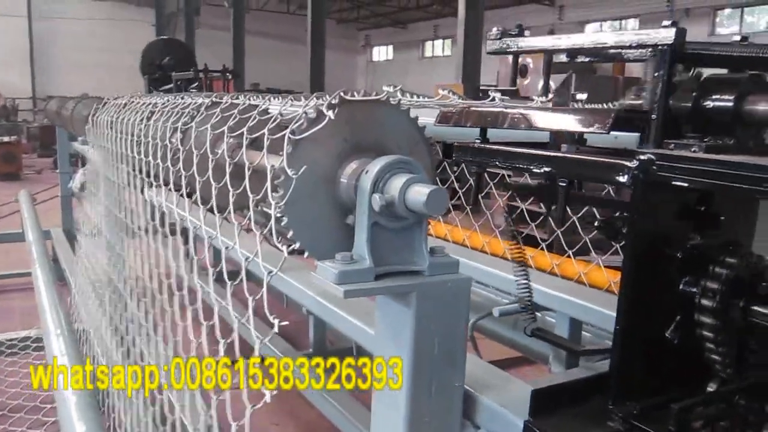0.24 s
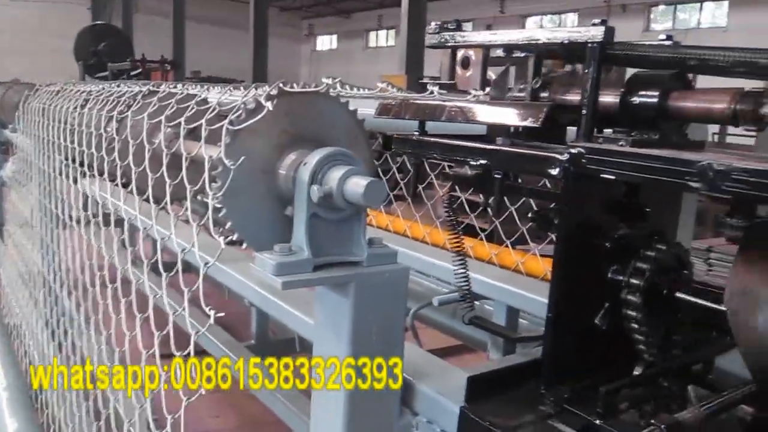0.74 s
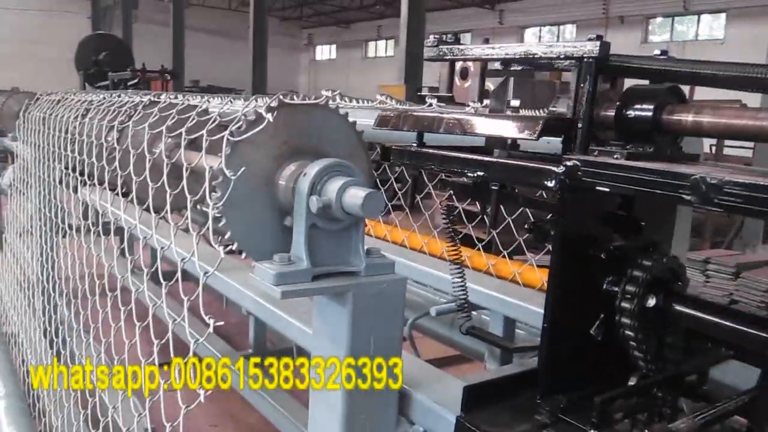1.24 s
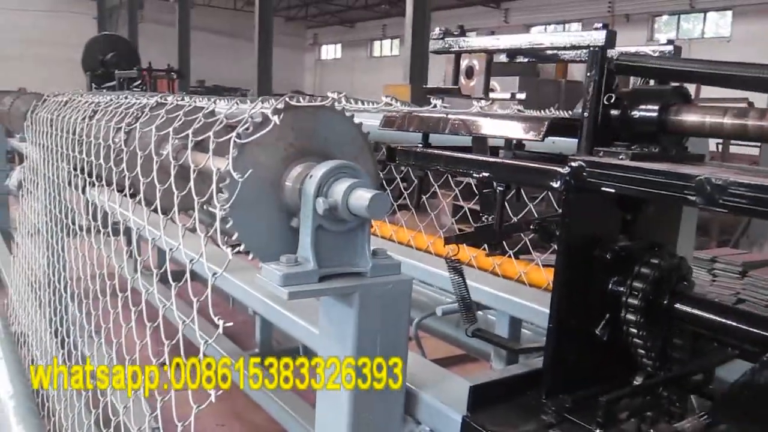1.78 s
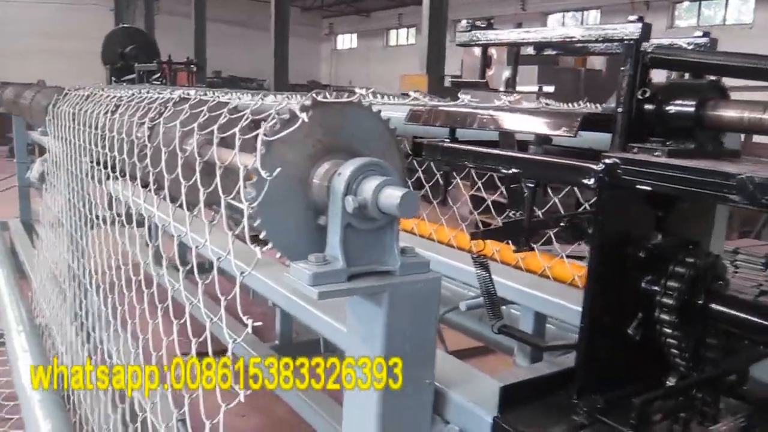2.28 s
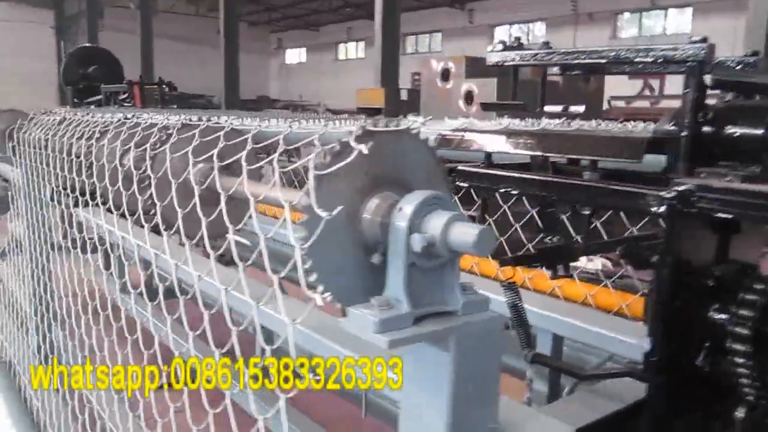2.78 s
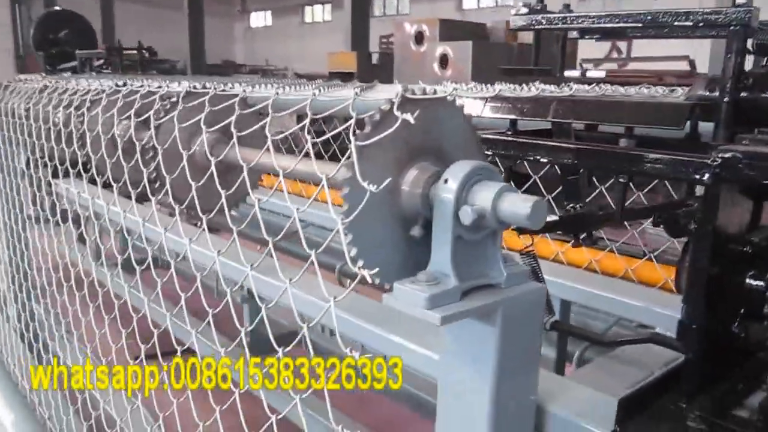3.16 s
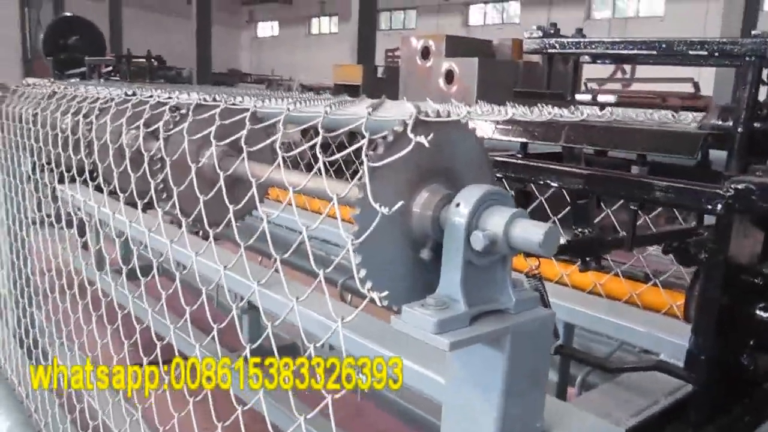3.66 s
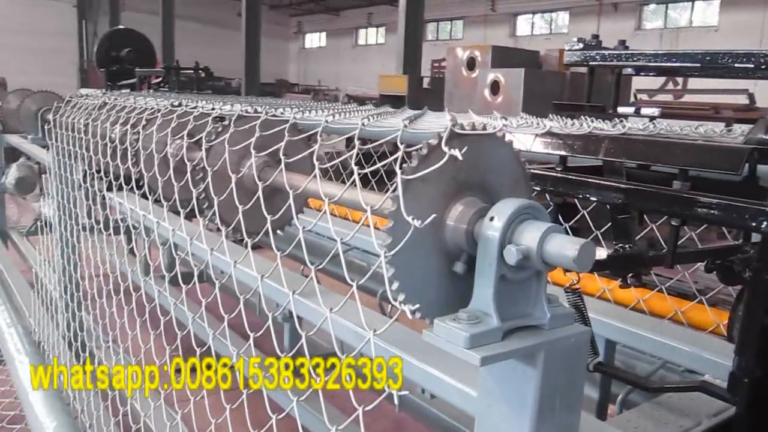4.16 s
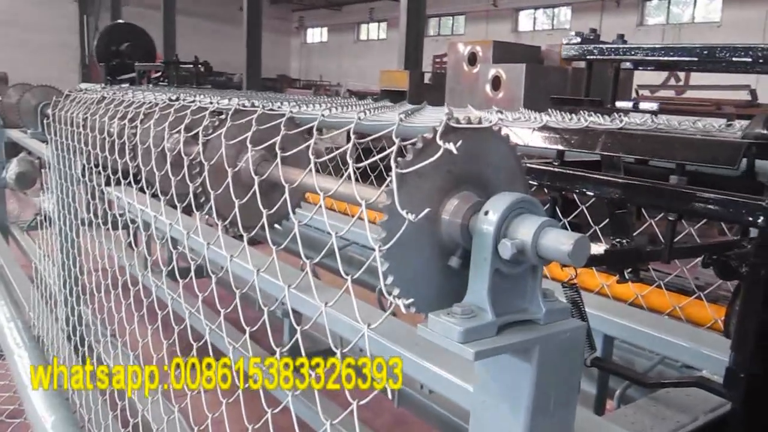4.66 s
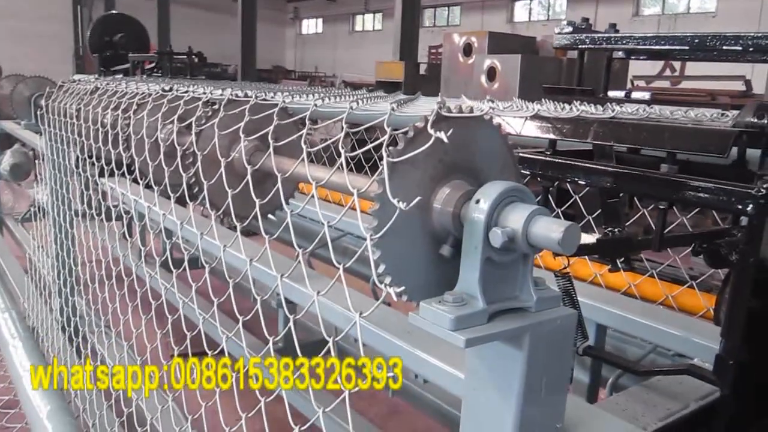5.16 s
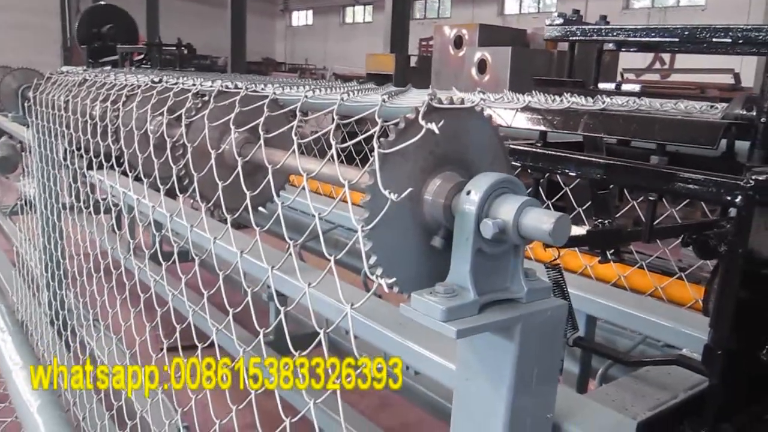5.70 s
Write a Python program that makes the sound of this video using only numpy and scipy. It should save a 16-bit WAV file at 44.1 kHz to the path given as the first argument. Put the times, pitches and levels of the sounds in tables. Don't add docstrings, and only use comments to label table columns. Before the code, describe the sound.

Close to a wire mesh weaving machine in a factory hall, a low gear hum throbs over rumble. Uneven snaps and hard steel clacks come first, the loudest just after one second and briefly dipping the level. Then quick, regular jingling slaps build and run to the end, with small knocks between them. Stereo small-camera sound with a short hall echo.

```python
import sys
import numpy as np
from scipy import signal
from scipy.fft import rfft, irfft, next_fast_len
from scipy.io import wavfile
from scipy.ndimage import uniform_filter1d

SR = 44100
rng = np.random.default_rng(int(sys.argv[2]) if len(sys.argv) > 2 else 0)


def attenuation_scalar(level_db):
    decades = np.asarray(level_db, float) / 20
    return 10 ** decades


def inscribe(sig):
    pcm = np.round(np.clip(np.atleast_2d(sig).T, -1, 1) * 32767)
    wavfile.write(sys.argv[1], SR, pcm.astype(np.int16))


N = 261513
SIZE = next_fast_len(N + N % 2, True)
HZ = np.fft.rfftfreq(SIZE, 1 / SR)
T = np.arange(N) / SR

TURN_S, MESH_HZ = 0.3, 200
WEAVE_START_S = 1.03

# throbs_per_turn, depth_db, first_peak_s
LOAD_THROB = [
    [(1, 1.3, .296), (2, 2, .124), (4, 1.7, .031)],
    [(1, 1.3, .113), (2, 1.1, .14), (3, 1.8, .083), (4, 2.5, .019)],
    [(1, 3.2, .266), (2, 4.1, .146), (4, 2.9, .045), (5, 2.8, .009), (6, 3, .043)],
]
# throbs_per_turn, depth_db, first_peak_s
THROB_BEFORE_STEP = [(1, 1.5, .183), (2, 2.2, .035), (3, 3.6, .09), (4, 3.6, .023)]
# sways_per_turn, depth_ms, first_peak_s
RUNOUT_SWAY = [
    [(1, .43, .122), (2, .21, .08), (3, .19, .083), (4, .17, .029)],
    [(2, .05, .108), (3, .11, .012), (4, .11, .039)],
]
# order_of_turn, level_db
CASING_ORDERS = [(130, -43), (135, -41), (138, -36), (141, -35.5), (146, -44), (149, -38), (150, -42),
                 (156, -42)]
# freq_hz, density_db (per Hz)
TOOTH_WEAR = [(60, -20), (150, -17), (200, -20), (235, -7), (290, -9), (340, -2), (385, -12), (555, -24),
              (660, -12), (750, -13), (797, 6), (870, -12), (990, -1), (1250, -19)]
# freq_hz, level_db
SHAFT_TONES = [(120, -50), (300, -46), (650, -46), (720, -45), (1193.3, -50)]
MESH_BEFORE_DB, MESH_AFTER_DB = (-26.5, -23.5, -33, -35), (-28.5, -21.5, -35.5, -35.5)
STEP_S, STEP_TAKES_S = 2.47, 0.24
CASING_TRIM_DB, KICK_S, WEAR_DB = 2.8, 0.023, -33


def gear():
    after = 1 / (1 + np.exp((STEP_S - T) / STEP_TAKES_S))
    throb1, throb2, throb3 = (swing(rows) for rows in LOAD_THROB)
    throb2 = after * throb2 + (1 - after) * swing(THROB_BEFORE_STEP)
    tone_early_ms, multiples_early_ms = (swing(rows) for rows in RUNOUT_SWAY)

    tones = np.zeros(N)
    for m, throb_db in enumerate((throb1, throb2, throb3, throb1)):
        early_ms = multiples_early_ms if m else tone_early_ms
        cycles = (m + 1) * MESH_HZ * (T + early_ms / 1000) + rng.random()
        mean_db = MESH_BEFORE_DB[m] + (MESH_AFTER_DB[m] - MESH_BEFORE_DB[m]) * after
        tones += attenuation_scalar(mean_db + throb_db) * np.cos(2 * np.pi * cycles)

    casing = swing([(order, attenuation_scalar(db + CASING_TRIM_DB), KICK_S) for order, db in CASING_ORDERS])

    turn_size = round(TURN_S * SR)
    wear_colour = attenuation_scalar(read(TOOTH_WEAR, np.fft.rfftfreq(turn_size, 1 / SR)))
    wear = irfft(wear_colour * rfft(rng.standard_normal(turn_size)), turn_size)

    hum = np.sqrt(2) * (tones + casing) + attenuation_scalar(WEAR_DB) * np.resize(evened(wear), N)
    for freq_hz, db in SHAFT_TONES:
        hum += attenuation_scalar(db) * np.sqrt(2) * np.sin(2 * np.pi * freq_hz * T)
    return ports(hum, np.roll(hum, 3000))


def swing(rows):
    t = T[:round(TURN_S * SR)]
    one_turn = sum(depth * np.cos(2 * np.pi * count * (t - s) / TURN_S) for count, depth, s in rows)
    return np.resize(one_turn, N)


# start_s, level_db (peak), body_db, t60_s
BLADE_SLAPS = [(1.6258, -21, -7, 0.073), (1.785, -18, -8.5, 0.16), (1.9306, -13.5, -12.5, 0.082),
               (2.0767, -13, -12.5, 0.12), (2.234, -9.5, -20, 0.057), (2.387, -4.5, -15, 0.039),
               (2.5402, -12.5, -31, 0.078), (2.6885, -10.5, -9.5, 0.087), (2.8415, -10, -21, 0.13),
               (2.9963, -7.5, -10.5, 0.086), (3.1493, -9.5, -18, 0.089), (3.2915, -9, -9, 0.13),
               (3.4548, -8, -12.5, 0.068), (3.593, -7.5, -18, 0.079), (3.782, -11.5, -9.5, 0.044),
               (3.8942, -8.5, -14, 0.13), (4.0592, -8.5, -9.5, 0.077), (4.197, -6, -12, 0.11),
               (4.3601, -13, -12, 0.12), (4.5015, -8.5, -11, 0.089), (4.6773, -9, -10.5, 0.06),
               (4.8021, -11, -9.5, 0.085), (4.9717, -12.5, -11, 0.08), (5.1062, -8, -11, 0.092),
               (5.285, -8, -11, 0.041), (5.4012, -6.5, -11, 0.087), (5.5504, -9.5, -12, 0.12),
               (5.723, -7, -16, 0.044), (5.8734, -9.5, -7.5, 0.065)]
# start_s, level_db (peak), body_db
FEED_SNAPS = [(.0034, -14.5, 2), (.0114, -14.5, -16), (0.0522, -5, -0.5), (.0814, -25.5, 6),
              (0.1264, -18.5, 0.5), (.2319, -16, -18), (.3012, -20.5, -2), (.422, -11, -27),
              (0.4648, -16.5, -6), (.5394, -12, -16), (.5744, -16, -6), (.605, -4.5, -15),
              (.6164, -19.5, 6), (0.66, -11, -17), (0.7184, -10.5, -20), (0.757, -14, -20),
              (0.781, -22, 3.5), (0.8516, -19.5, -25), (.8824, -15, -12), (1.0228, -9, -27),
              (1.036, -12, -12), (1.067, -4, -9.5), (1.133, -6, -13.5), (1.1615, -4, -14), (1.1896, -17, 3),
              (1.1985, -10, -4), (1.2926, -12.5, -7.5), (1.383, -29.5, 6), (1.482, -15.5, -14),
              (1.5045, -25.5, 7.5)]
# start_s, level_db (peak), body_db
WIRE_TOUCHES = [(1.6862, -24.5, -3.5), (1.9854, -32, 6.5), (2.0249, -23, -7), (2.285, -28.5, 5.5),
                (2.4634, -18, -15), (2.5673, -16.5, -1), (2.743, -16, -32), (2.7916, -23, -19),
                (3.2246, -19, -7), (3.3558, -18, -3.5), (3.5075, -19, -3), (3.609, -8, -9),
                (3.7499, -34, 1), (3.8557, -22, -14), (4.2055, -16.5, 1), (4.4459, -20, -9),
                (4.515, -15, -2.5), (4.661, -16, -10), (4.7497, -18.5, -12), (4.8704, -25.5, -2),
                (4.9562, -17.5, -15), (5.047, -30, -12), (5.0894, -29.5, 2), (5.249, -9.5, -17),
                (5.2695, -14, -16), (5.3388, -23, -19), (5.558, -18, -6.5), (5.7087, -11, -11),
                (5.8192, -18.5, -6), (5.8505, -10.5, -10)]
# freq_hz, density_db (per Hz)
WIRE_COLOUR = [(300, -18), (900, -6), (1800, -5), (3000, -2.5), (5000, 1.5), (6800, -0.5), (9500, -7.5),
               (12000, -9), (14500, -18), (16500, -27)]
# body_db, middle_db, fizz_db
JINGLE_FLICKER = (.5, 1.5, 2.7)
WEAVE_RISE_S, JINGLE_FEED_DB, JINGLE_WEAVE_DB = 0.1, -43.5, -32.5
TOUCH_T60_S, SNAP_T60_S = 0.085, 0.096
SLAP_FIZZ_DB, TOUCH_FIZZ_DB, SNAP_FIZZ_DB = -14.5, -14, -21
SNAP_LINGER = 0.079
SNAP_FIZZ_PER_BODY = -0.31


def mesh():
    weaving = 1 / (1 + np.exp((WEAVE_START_S - T) / WEAVE_RISE_S))
    jingle_db = JINGLE_FEED_DB + (JINGLE_WEAVE_DB - JINGLE_FEED_DB) * weaving + jolts(order=3)
    flicker = evened(smooth(rng.standard_normal(N), 900, 900, second_axis=0))
    jingle = attenuation_scalar(jingle_db) * attenuation_scalar(np.outer(JINGLE_FLICKER, flicker))

    snap_rows = [(s, db, body, SNAP_T60_S * attenuation_scalar(SNAP_LINGER * body)) for s, db, body in FEED_SNAPS]
    touch_rows = [(*row, TOUCH_T60_S) for row in WIRE_TOUCHES]
    power = shaking(snap_rows, 1.0, SNAP_FIZZ_DB, SNAP_FIZZ_PER_BODY)
    power += shaking(touch_rows, 1.25, TOUCH_FIZZ_DB)
    power += shaking(BLADE_SLAPS, 1.77, SLAP_FIZZ_DB)
    shake = np.sqrt(power + jingle ** 2)

    body = 1 / (1 + (HZ / 3500) ** 6)
    fizz = 1 / (1 + (8300 / (HZ + 1)) ** 12)
    wire = attenuation_scalar(read(WIRE_COLOUR, HZ))
    wire /= np.sqrt(np.mean(wire ** 2))
    contacts = grains()
    bands = zip(shake, (body, 1 - body - fizz, fizz))
    return sum(ports(*(contacts * level), wire * share) for level, share in bands)


def shaking(events, hold, fizz_db, slope=0):
    power, t = np.zeros((3, N)), np.arange(9000) / SR
    for s, db, body_db, t60 in events:
        fall_db = 60 * (t / t60) ** hold
        shower = (1 - np.exp(-t / 0.00063)) * attenuation_scalar(db - gain_db(s) - fall_db)
        colours_db = (body_db + 5.5, -8.5, fizz_db + slope * body_db + 9.5)
        for row, colour_db in zip(power, colours_db):
            add(row, s, (shower * attenuation_scalar(colour_db)) ** 2)
    return power


def grains():
    struck = rng.random(N) < 12000 / SR
    size = attenuation_scalar(2.0 * np.minimum(rng.exponential(1, N), 4)) * struck
    z = signal.stft(size * rng.standard_normal((2, N)), nperseg=256, noverlap=192)[2]
    patches = rng.standard_normal((2,) + z.shape[1:])
    rings = evened(smooth(patches[0], 2, 9))
    clumps = evened(smooth(patches[1], 25, 3))
    z = z * attenuation_scalar(2.6 * rings + 1.24 * clumps)
    return evened(signal.istft(z, nperseg=256, noverlap=192)[1][:, :N])


# start_s, level_db (peak), pitch_hz, t60_s
CAM_CLACKS = [(0.0044, -4, 2630, 0.045), (0.0557, 0, 2370, 0.05), (0.606, -5, 5060, 0.031),
              (0.615, -2.5, 2950, 0.045), (1.0685, -18, 3600, 0.045), (1.1338, -6, 3460, 0.032),
              (1.1608, 9.5, 2790, 0.043), (1.1625, 1.5, 2226, 0.11), (1.1998, -5, 2310, 0.04),
              (1.2948, -13, 2620, 0.04), (1.507, -20, 2370, 0.042)]
# pitch_factor, level_db
STEEL_MODES = [(1, 0), (.74, -11), (1.15, -3), (1.55, -5), (2.1, -9), (1.85, -12)]
# start_s, level_db (peak), pitch_hz, t60_s
BAR_KNOCKS = [(0.108, -23, 1000, 0.1), (0.2835, -21, 994, 0.11), (0.392, -20, 990, 0.15),
              (0.4894, -19.5, 1002, 0.21), (0.5643, -17.5, 977, 0.1), (0.77, -23.5, 970, 0.19),
              (1.3924, -27, 1000, 0.12), (1.9883, -19.5, 978, 0.097), (2.1916, -32, 997, 0.12),
              (2.299, -16, 1013, 0.08), (3.017, -20.5, 977, 0.14)]
# start_s, level_db (peak), pitch_hz, t60_s
GUIDE_KNOCKS = [
    (1.078, -14.5, 1165, 0.077),
    (1.6902, -20, 1133, 0.057),
    (2.2877, -21, 1307, 0.076),
    (2.593, -16.5, 1140, 0.062),
    (2.889, -25, 1310, 0.085),
    (3.1957, -21, 1295, 0.055),
    (4.0886, -26, 1076, 0.082),
    (4.5205, -22, 1125, 0.085),
    (5.299, -22, 1370, 0.076),
    (5.6, -17.5, 1314, 0.044),
]


def blows():
    hits = np.zeros(N)
    for s, db, hz, t60 in CAM_CLACKS:
        clack = sum(attenuation_scalar(mode_db) * ring(hz * factor, t60, 0.00043) for factor, mode_db in STEEL_MODES)
        add(hits, s, attenuation_scalar(db - 8.5 - gain_db(s)) * clack)
    for s, db, hz, t60 in BAR_KNOCKS + GUIDE_KNOCKS:
        knock = ring(hz, t60, 0.0021) + 0.5 * ring(hz, t60, 0.0048)
        add(hits, s, attenuation_scalar(db + 1.0 - gain_db(s)) * knock)
    return ports(hits, np.roll(hits, 7))


def ring(hz, t60, rise_s):
    t = np.arange(6000) / SR
    return (1 - np.exp(-t / rise_s)) * attenuation_scalar(-60 * t / t60) * np.sin(2 * np.pi * hz * t)


# freq_hz, density_db (per Hz)
FRAME_RUMBLE = [(20, -19), (60, -17), (200, -7.5), (310, -5), (405, 4), (440, -5.5), (490, -3), (548, -6),
                (620, -8), (1000, -4), (1350, -12.5), (2500, -16), (6000, -25), (16500, -83)]
RUMBLE_FEED_DB, RUMBLE_WEAVE_DB, SETTLE_S = -20, -23.5, 1.6


def rumble():
    a, b, lumps = rng.standard_normal((3, N))
    lumps = attenuation_scalar(1.2 * evened(uniform_filter1d(lumps, 1500)))
    settled = 1 - np.exp(-np.maximum(T - WEAVE_START_S, 0) / SETTLE_S)
    level_db = RUMBLE_FEED_DB + (RUMBLE_WEAVE_DB - RUMBLE_FEED_DB) * settled + jolts(order=2)
    return attenuation_scalar(level_db) * evened(ports(a * lumps, b * lumps, attenuation_scalar(read(FRAME_RUMBLE, HZ))))


# start_s (centre), width_s, rumble_rise_db, jingle_rise_db
CARRIAGE_JOLTS = [
    (.1, 0.074, -2, 6),
    (.58, 0.15, 1.8, 17),
    (1.08, 0.036, 5.5, -4),
    (1.85, 0.071, 0.2, 3),
    (4.3, 0.28, -1.5, -1),
    (5.3, 0.18, 0.8, 3.5),
]


def jolts(order):
    return sum(row[order] * np.exp(-((T - row[0]) / row[1]) ** 2) for row in CARRIAGE_JOLTS)


# freq_hz, t60_s
HALL_DECAY = [(300, 0.41), (2000, 0.45), (6000, 0.23), (15000, 0.15)]


def hall(x):
    taps = np.zeros((2, SR))
    at = np.arange(300, SR - 20, 20) + rng.integers(0, 20, (2, (SR - 301) // 20))
    np.put_along_axis(taps, at, rng.choice([-1., 1.], at.shape), 1)
    hz, t, z = signal.stft(taps, SR, nperseg=256)
    fall_db = -60 * t / read(HALL_DECAY, hz)[:, None]
    tail = signal.istft(z * attenuation_scalar(fall_db), SR, nperseg=256)[1]
    return signal.fftconvolve(x, tail / np.linalg.norm(tail[0]), axes=1)[:, :N]


# freq_hz, likeness (0-1)
PORT_LIKENESS = [(25, .965), (60, .988), (200, .997), (700, .982), (1400, .89), (2100, .62), (3400, .66),
                 (5000, .35), (7500, .35), (9000, .1), (15000, .3)]
# freq_hz, left_minus_right_db
PORT_LEAN = [(60, -.1), (500, -.1), (1200, .9), (2400, -1.8), (4500, -.1), (9000, .6), (14000, -.6)]


def ports(a, b, gain=1):
    same = np.clip(read(PORT_LIKENESS, HZ), 0, 1)
    za, zb = rfft(a, SIZE), rfft(b, SIZE)
    left = za * np.exp(-2j * np.pi * HZ * 2 / SR)
    right = same * za + np.sqrt(1 - same ** 2) * zb
    lean = attenuation_scalar(read(PORT_LEAN, HZ) / 2)
    return irfft(gain * np.array([left * lean, right / lean]), SIZE)[:, :N]


# start_s, dip_db
GAIN_DUCKS = [(0.055, 4), (.615, 2.5), (.78, 1), (.95, 1.5), (1.08, 1.5), (1.162, 13.5), (2.4, 1.4),
              (2.7, -0.7), (3.3, 1.4), (3.6, 0.9), (4.2, 2.5), (4.55, 1.6), (4.85, 0.1), (5.15, 1.1),
              (5.45, 0.6), (5.75, 0.9)]
REST_DB, DUCK_S, RECOVER_S = 0.48, 0.01, 0.53


def gain_db(t):
    gain = REST_DB
    for s, dip_db in GAIN_DUCKS:
        since = np.maximum(t - s, 0)
        gain = gain - dip_db * (1 - np.exp(-since / DUCK_S)) * np.exp(-since / RECOVER_S)
    return gain


def evened(x):
    return x / np.sqrt(np.mean(x ** 2) + 1e-20)


def smooth(x, first, second, second_axis=1):
    return uniform_filter1d(uniform_filter1d(x, first, axis=0), second, axis=second_axis)


def read(points, hz):
    f, value = np.transpose(points)
    return np.interp(np.log(hz + 1), np.log(f + 1), value)


def add(mix, s, sound):
    part = mix[round(s * SR):][:len(sound)]
    part += sound[:len(part)]


def scene():
    wire, hits = mesh(), blows()
    wet = hall(attenuation_scalar(-11.5) * wire + attenuation_scalar(-17) * hits)
    return gear() + wire + hits + rumble() + ports(*wet)


def low_pass(x):
    return signal.sosfilt(signal.butter(12, 16510, fs=SR, output="sos"), x)


NOTCH_HZ, NOTCH_WIDTH_HZ, NOTCH_DB, EDGE_HZ = 8230, 330, -29, 15600


def record(dry):
    gain = np.interp(T, T[::32], attenuation_scalar(gain_db(T[::32])))
    notch_db = NOTCH_DB / (1 + ((HZ - NOTCH_HZ) / NOTCH_WIDTH_HZ) ** 2)
    colour = attenuation_scalar(notch_db) / (1 + (HZ / EDGE_HZ) ** 90)
    mix = irfft(rfft(dry * gain, SIZE) * colour, SIZE)[:, :N]
    return low_pass(np.clip(mix, -1, 1))


dry = scene()
out = record(dry)
inscribe(out)
```